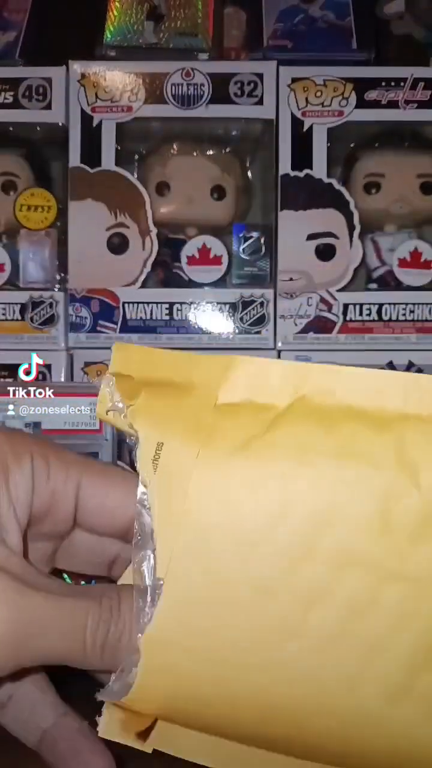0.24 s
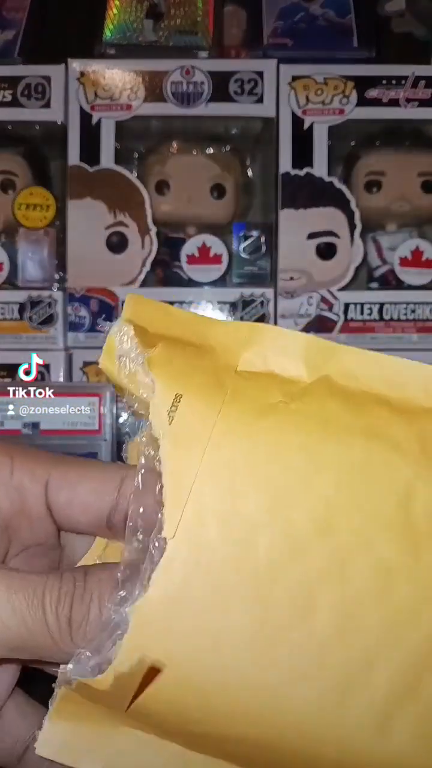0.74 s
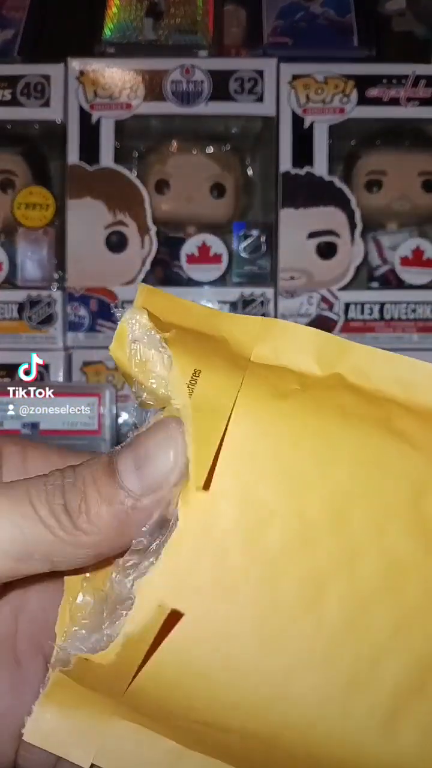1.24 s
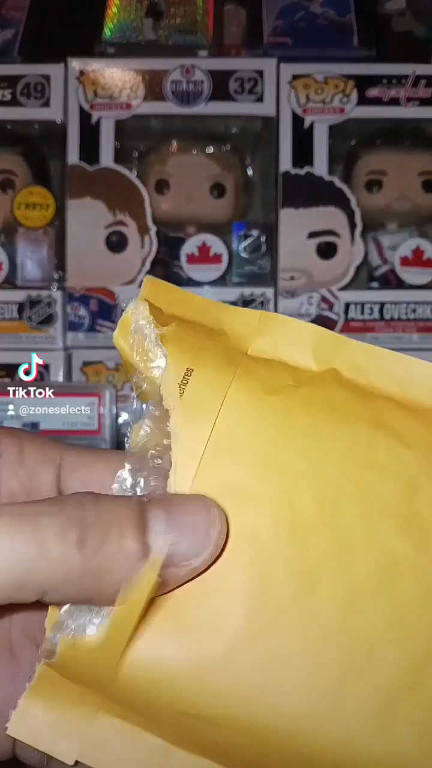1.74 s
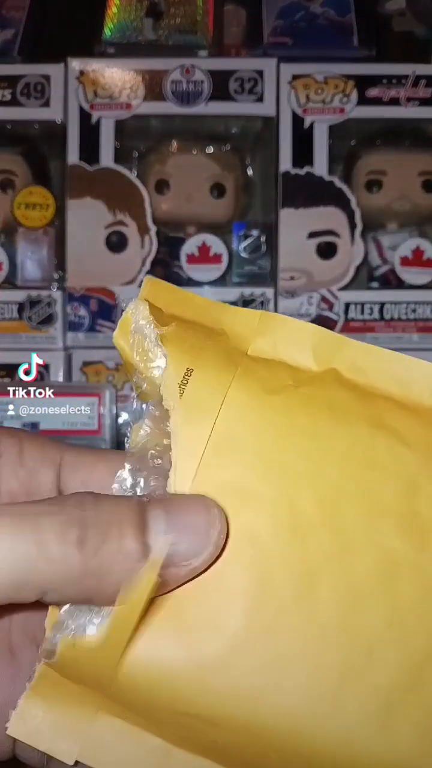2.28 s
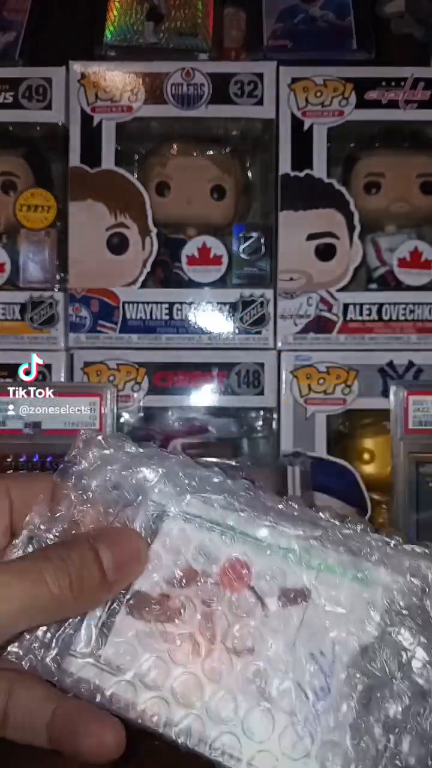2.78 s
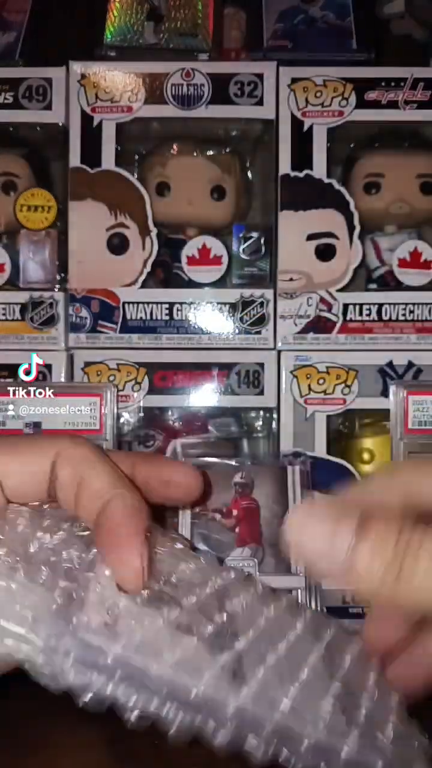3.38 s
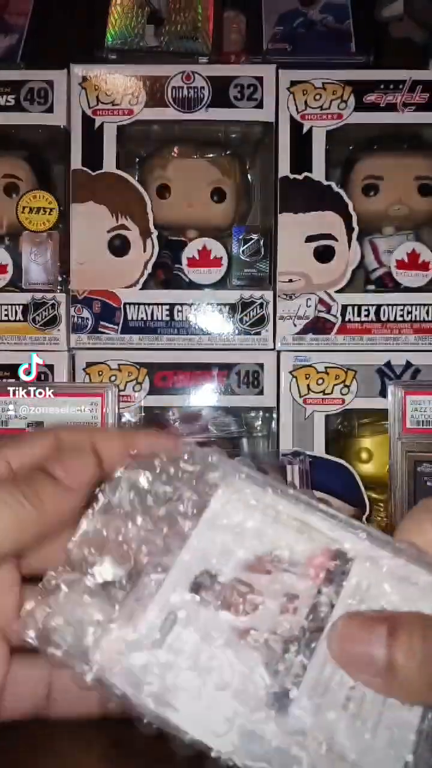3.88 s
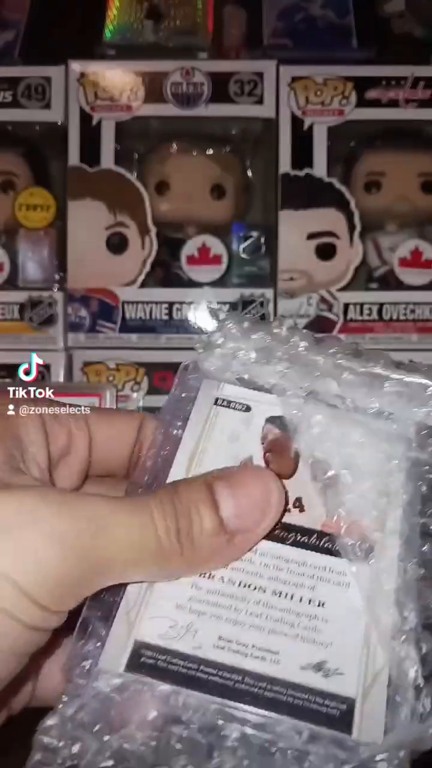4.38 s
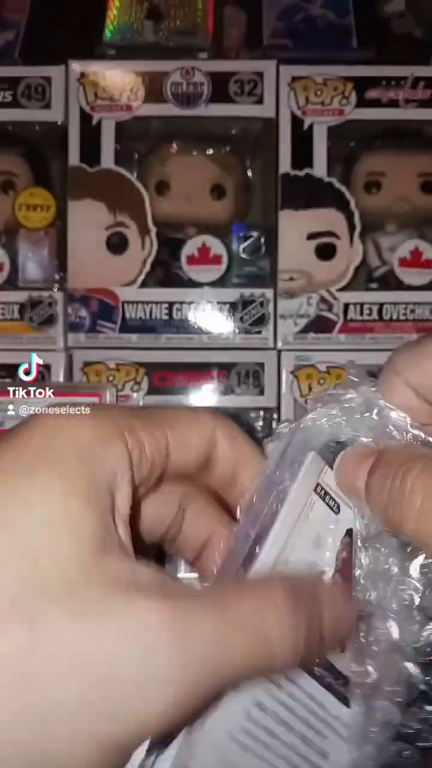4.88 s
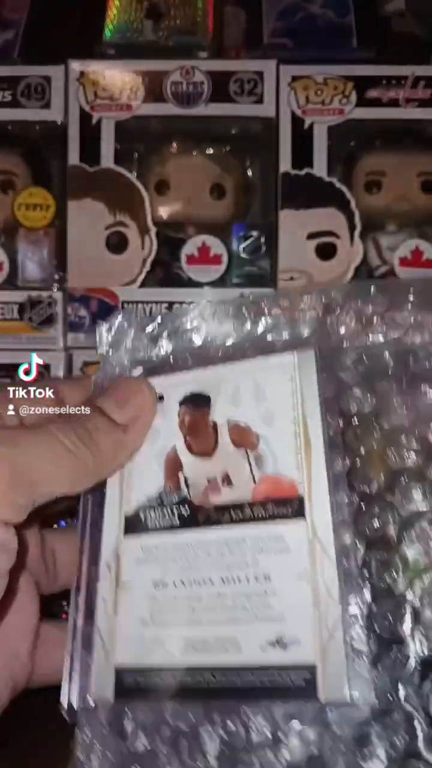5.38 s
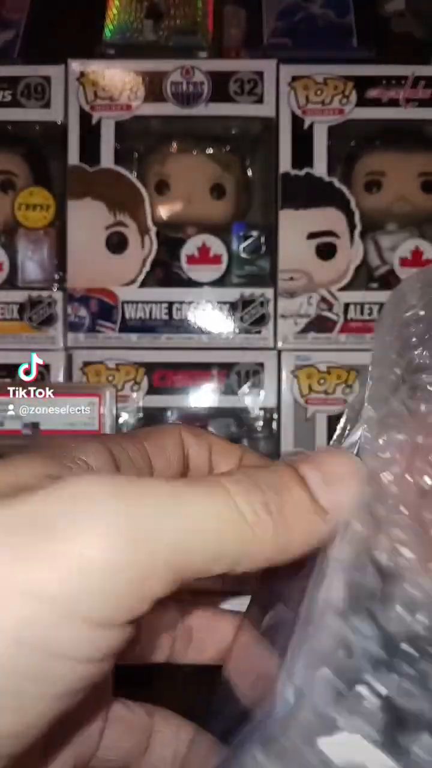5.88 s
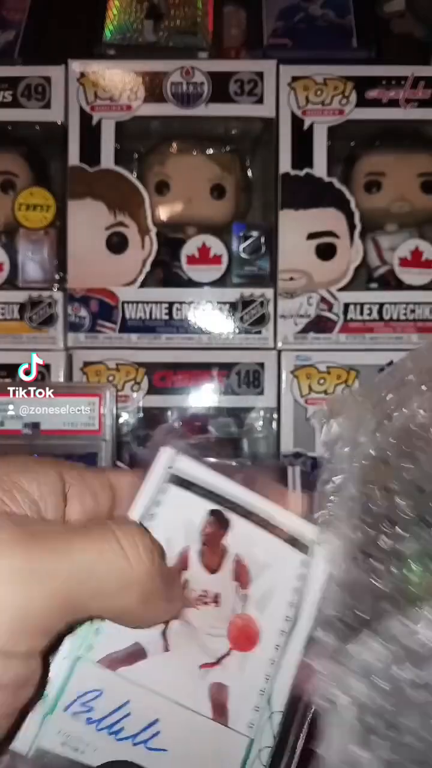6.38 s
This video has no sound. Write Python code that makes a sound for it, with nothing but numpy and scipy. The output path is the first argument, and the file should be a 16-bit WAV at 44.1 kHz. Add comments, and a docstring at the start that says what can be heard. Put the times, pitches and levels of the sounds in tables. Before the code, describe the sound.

Hands handle an already opened padded mailer, with busy papery crackles, sharp crease snaps and soft low bumps. A quick rushing pull brings out the packet. Lighter bubble-wrap crinkling follows, then three brief, loud rips with gaps of rustling between them, the last ending in a rasp of hard plastic. Close phone microphone, small room, faint steady room noise.

```python
"""Bubble-wrapped card pulled from a padded mailer

Hands pull the packet out of a paper mailer, then rip the wrap in three fast rips, close to a phone in a small room.
Film and paper buckle in clouds of noise clicks; creases snap through as dispersed, ringing bursts.
Scuffs are short puffs of the clicks, bumps are damped low swings, and the card holder rasps in filtered clicks.
A faint noise ring comes and goes; two unlike ports hear it all with shelf echoes, over a room tone."""
import sys
import numpy as np
from scipy import signal
from scipy.fft import rfft, irfft, next_fast_len
from scipy.io import wavfile

SR = 44100
rng = np.random.default_rng(int(sys.argv[2]) if len(sys.argv) > 2 else 0)


def transcribe(u):
    """Save the signal u as a 16-bit wav file named by the first command-line argument.

    u: samples, shape (n,) or (channels, n), limited to [-1, 1]; the rate is SR.
    q: integer samples, one column per channel.
    """
    v = np.clip(np.atleast_2d(u).T, -1, 1)
    q = np.round(v * 32767).astype(np.int16)
    wavfile.write(sys.argv[1], SR, q)


N = 292383
TIME_S = np.arange(N) / SR

# spectrum of the thin film: (frequency [Hz], relative level per hertz [dB])
FILM = [(1200, -18), (2200, -3), (3100, 1), (4800, 0.5), (6500, -2), (9300, -2.5), (12500, -1),
        (16000, -2.5)]
# spectrum of the stiffer sheet: (frequency [Hz], relative level per hertz [dB])
SHEET = [(500, -20.5), (900, -5.5), (1250, -6), (1550, 2), (2000, -2), (2600, -1.5), (4000, -10)]
# spectrum of the air held in the packet: (frequency [Hz], relative level per hertz [dB])
BODY = [(40, -12), (125, -10), (200, -8), (280, -10.5), (370, -8), (490, -4), (590, 2.5), (720, -1),
        (950, -9), (1500, -13.5)]


def undb(db):
    """Decibels to gain."""
    return 10 ** (np.asarray(db) / 20)


def unit(x):
    """Scale to rms 1."""
    return x / np.sqrt(np.mean(x ** 2))


def convolve(x, response):
    """Filter each channel, keeping the length."""
    return signal.oaconvolve(x, np.atleast_2d(response), axes=-1)[:, :x.shape[-1]]


def colour(x, points, size=2048):
    """Minimum-phase filter with the given (Hz, dB) spectrum, by folding the cepstrum."""
    points_hz, points_db = np.transpose(points)
    bins_hz = np.maximum(np.arange(size // 2 + 1) * SR / size, 1)
    gain = undb(np.interp(np.log(bins_hz), np.log(points_hz), points_db))
    cepstrum = irfft(np.log(gain))
    cepstrum[1:size // 2] *= 2
    cepstrum[size // 2 + 1:] = 0
    return convolve(x, irfft(np.exp(rfft(cepstrum))))


def add(out, start_s, sound):
    """Mix a sound in at a time in seconds."""
    i = int(np.clip(start_s * SR, 0, N - 1))
    out[:, i:i + sound.shape[1]] += sound[:, :N - i]


def air(size, alike_hz=1900):
    """Flat noise at the two ports: long waves reach both alike, short ones do not."""
    hz = np.arange(size // 2 + 1) * SR / size
    mid, side = rfft(rng.standard_normal((2, size)))
    apart = hz ** 2 / (hz ** 2 + alike_hz ** 2)
    port_sign = np.array([[1], [-1]])
    return irfft((mid + port_sign * apart * side) / np.sqrt(1 + apart ** 2))


def room_tone(level_db=-67.5):
    """Steady coloured noise of the room, independent at each port."""
    # (frequency [Hz], relative level per hertz [dB])
    tone_spectrum = [(18, -36), (30, -1.5), (107, 2), (774, -27), (2430, -17.5), (2700, -22.5), (3780, 2.5),
                     (7430, -8), (15000, -22.5)]
    return undb(level_db) * unit(colour(rng.standard_normal((2, N)), tone_spectrum))


def flick(decay_s, size=512):
    """One buckle of a facet: a brief burst of energy 1."""
    burst = air(size) * np.exp(-np.arange(size) / SR / decay_s)
    return burst / np.sqrt(np.sum(burst ** 2, axis=1, keepdims=True))


def crackle(per_s, spread_db, decay_s, rub_db, facets=3):
    """Buckles of very unequal size on a few facets, in the fine hiss of surfaces rubbing; rms 1."""
    clicks = 0
    fires = slice(int(per_s * N / SR / facets))
    for _ in range(facets):
        when, strength, side = rng.random((3, N // 12))
        size_db = spread_db * np.minimum(-np.log(1 - strength), 5)
        sizes = np.sign(side - .5) * undb(size_db)
        impulses = np.bincount((when[fires] * N).astype(int), sizes[fires], N)
        clicks = clicks + convolve(impulses[None], flick(decay_s))
    hiss = air(2 * next_fast_len(N // 2 + 1, True))[:, :N]
    return unit(unit(clicks) + undb(rub_db) * unit(hiss))


def catch(per_s, depth_db):
    """Gain of a grip that catches and slips at random; rms 1."""
    knots_s = np.cumsum(rng.exponential(1 / per_s, N // 100))
    depths = np.clip(rng.standard_normal(len(knots_s)), -2, 2)
    return unit(undb(depth_db * np.interp(TIME_S, knots_s, depths)))


def effort(peak_s, db, swell_s, fade_s, hold_s=0, drop_db=9, curve=1.67):
    """Gain of one move: it swells, may hold, and fades; drop_db down one swell or fade time away."""
    before = (peak_s - TIME_S) / max(swell_s, .005)
    after = (TIME_S - peak_s - hold_s) / max(fade_s, .005)
    away = np.clip(np.maximum(before, after), 0, 10)
    return undb(db - drop_db * away ** curve)


def rustle(drive, film_power, sheet_power, body_power):
    """The same buckles sound in film, sheet and held air, each with its own power."""
    film = np.sqrt(film_power) * unit(colour(drive, FILM))
    sheet = np.sqrt(sheet_power) * unit(colour(drive, SHEET))
    body = np.sqrt(body_power) * unit(colour(drive, BODY))
    return film + sheet + body


def grips(moves, drive, film_db, sheet_db, body_db, sheet_share):
    """Each grip crinkles the film; the deeper it presses into the hollow, the more the sheet crackles too."""
    film = sheet = body = 0
    for s, db, swell_s, fade_s, hollow_db in moves:
        force = effort(s, db, swell_s, fade_s)
        film = film + (force * undb(film_db)) ** 2
        sheet = sheet + (force * undb(sheet_db + sheet_share * hollow_db)) ** 2
        body = body + (force * undb(body_db + hollow_db)) ** 2
    return rustle(drive, film, sheet, body)


def mailer_grips(drive):
    """Grips on the paper mailer crinkle its film and sheet and press its hollow."""
    # (time of most force [s], relative level [dB], swell [s], fade [s], relative hollow level [dB])
    mailer_moves = [(.03, -48.5, 0.051, 0.18, -3), (.19, -50.5, 0.048, 0.094, -7.5),
                    (.28, -45.5, 0.036, 0.052, -17.5), (.44, -50.5, 0.08, 0.061, -17.5),
                    (.6, -60, 0.067, 0.1, -22), (.745, -52, 0.05, 0.12, -44),
                    (.9, -47, 0.054, 0.067, -12.5), (1.015, -45.5, 0.045, 0.033, -10),
                    (1.13, -52.5, 0.11, .065, -10.5), (1.32, -45.5, 0.033, 0.014, -10.5),
                    (1.385, -43.5, 0.065, 0.11, -16.5), (1.57, -48.5, 0.038, 0.09, -19.5),
                    (1.68, -47.5, 0.04, 0.062, -19), (1.79, -41, 0.082, 0.062, -20.5),
                    (1.94, -51, 0.17, 0.035, -18), (2.05, -47.5, 0.15, 0.15, -17),
                    (2.19, -49.5, 0.035, .08, -31)]
    return grips(mailer_moves, drive, film_db=3.5, sheet_db=4.5, body_db=0, sheet_share=0.41)


def snap_wave(spread_s, scatter_db, size=512):
    """A snap crosses the sheet as bending waves, treble first; a stronger noisy scatter sounds together with it."""
    hz = np.arange(size // 2 + 1) * SR / size
    port_stretch = np.array([[1], [1.06]])
    delay_s = 0.000697 + spread_s * port_stretch * np.sqrt(1000 / (hz + 300))
    # phase is the running sum of group delay
    sweep = irfft(np.exp(-2j * np.pi * np.cumsum(delay_s, axis=1) * SR / size))
    scatter = np.roll(flick(decay_s=0.0017), int(.001 * SR), axis=1)
    return sweep + undb(scatter_db) * scatter


def snaps(quality=1.15, film_db=-7, edge_db=-11, thud_db=7, gain_db=-14, pad=256):
    """A crease snaps through: a few cycles of its own ring, a shiver of the film, a crisp edge and a body knock."""
    # creases: (time [s], relative level [dB], ring frequency [Hz], relative body level [dB])
    creases = [(0.051, -24, 1480, -13), (0.189, -20, 1320, 3), (0.222, -21, 2960, -22),
               (.407, -20.5, 2500, -14.5), (.905, -26, 1595, -15), (.913, -22.5, 1590, -30),
               (.965, -36.5, 6050, -30), (1.018, -25.5, 9000, -40), (1.104, -38, 2180, -27),
               (1.398, -30, 9200, -42), (1.663, -29.5, 4720, -43), (1.681, -35, 4900, -36),
               (1.794, -21, 1660, -6.5), (1.84, -30, 3770, -1), (2.049, -24.5, 1350, -37),
               (2.068, -15.5, 2170, -21), (2.742, -30.5, 1570, 0.5), (2.895, -14, 2280, -24.5),
               (2.969, -38, 1890, -30), (3.014, -33, 2250, -16), (3.061, -38, 1900, -17),
               (3.117, -39.5, 5400, -29), (3.435, -29.5, 6100, -56), (3.587, -35, 2970, -18),
               (3.73, -32.5, 7000, -47), (4.209, -17.5, 5270, -37), (4.359, -28.5, 4830, -26),
               (4.439, -32, 10800, -47), (4.514, -24.5, 11800, -38), (5.042, -24.5, 3520, -50),
               (5.07, -17, 4160, -25), (5.097, -18.5, 6100, -36), (5.119, -19, 1700, -21),
               (5.201, -18, 630, 4), (5.215, -21, 5000, 2), (5.267, -28.5, 5570, -8),
               (5.282, -26.5, 5500, -9), (5.378, -27, 4200, -37), (5.413, -32.5, 6500, -63),
               (5.532, -32, 4450, -10), (6.152, -17, 4670, -29.5), (6.369, -46, 9200, -8)]
    # spectrum of the edge: (frequency [Hz], relative level per hertz [dB])
    edge_spectrum = [(1500, -7), (4000, 15.5), (7000, -1.5), (12500, -13.5), (16000, 1.5)]
    edge_db_per_octave, edge_from_hz = 1.5, 4200
    out = np.zeros((2, N))
    for s, db, hz, body_db in creases:
        burst = np.hstack([snap_wave(spread_s=0.00127, scatter_db=3.5), np.zeros((2, pad))])
        b, a = signal.iirpeak(min(hz, SR / 3), max(quality, 1), fs=SR)
        ring = unit(signal.lfilter(b, a, signal.lfilter(b, a, burst)))
        shiver = undb(film_db) * unit(colour(burst, FILM))
        # the higher a crease rings, the crisper its edge
        crisp_db = edge_db + edge_db_per_octave * np.log2(hz / edge_from_hz)
        edge = undb(crisp_db) * unit(colour(burst, edge_spectrum))
        knock = undb(body_db + thud_db) * unit(colour(burst, BODY))
        add(out, s, undb(db + gain_db) * unit(ring + shiver + edge + knock))
    return out


def bumps(gain_db=3.0, rough=0.94, rise_s=0.0035, t60_s=0.11, size=12000):
    """Fingers jog the soft packet: a low, rough, quickly damped swing."""
    # (time [s], relative peak level [dB], pitch [Hz])
    jogs = [(0.914, -53, 220), (1.324, -50, 155), (1.491, -43.5, 123), (1.728, -42, 133),
            (1.794, -48.5, 136), (2.048, -46, 200), (2.299, -48, 70), (2.345, -54, 58), (2.752, -47, 50),
            (2.896, -40.5, 125), (3.018, -52, 121), (4.225, -37.5, 160), (4.784, -58, 78),
            (5.198, -39.5, 119), (5.244, -47, 62), (5.575, -47.5, 58), (6.127, -33, 238),
            (6.153, -41.5, 115), (6.251, -58, 100)]
    out = np.zeros((2, N))
    t = np.arange(size) / SR
    envelope = (1 - np.exp(-t / rise_s)) * np.exp(-np.log(1000) * t / t60_s)
    for s, db, hz in jogs:
        band = signal.butter(2, [hz / 2, 2 * hz], "band", fs=SR, output="sos")
        flutter = unit(signal.sosfilt(band, rng.standard_normal((2, size))))
        swing = (np.sin(2 * np.pi * hz * t) + rough * flutter) * envelope
        add(out, s, undb(db + gain_db) * swing / np.abs(swing).max())
    return out


def scuffs(drive, gain_db=-9, sheet_db=-4, hollow_db=8, rise_s=0.0028, size=4096):
    """Short dense puffs of buckles, two of them inside the last rip, each gone in a few hundredths of a second."""
    # (start [s], relative level [dB], relative body level [dB])
    puffs = [(1.322, -36.5, -12), (1.37, -35, -2.5), (1.486, -23, -13.5), (1.723, -26.5, -7.5),
             (3.959, -52.5, 10.5), (6.025, -28.5, -14), (6.111, -21.5, -18), (6.134, -13.5, -23),
             (6.497, -45, -18)]
    out = np.zeros((2, N))
    for s, db, body_db in puffs:
        span = slice(int(s * SR) + 1, int(s * SR) + size)
        film = unit(colour(drive[:, span], FILM))
        sheet = undb(sheet_db) * unit(colour(drive[:, span], SHEET))
        body = undb(body_db + hollow_db) * unit(colour(drive[:, span], BODY))
        age = (TIME_S[span] - s) / rise_s
        envelope = age * np.exp(1 - age)
        add(out, s, undb(db + gain_db) * envelope * (film + sheet + body))
    return out


def rips(drive, film_db=2, sheet_db=2, body_db=2, sheet_share=0.68, load_s=0.027):
    """The film gives way first; sheet and hollow join load_s later as the rip takes up load; all stop together."""
    # the pull out of the mailer, then three fast rips:
    # (full speed at [s], relative level [dB], swell [s], fade [s], relative hollow level [dB], hold [s])
    pulls = [(2.279, -37, 0.051, 0.072, -10.5, 0.028), (4.203, -32.5, 0.043, 0.031, -11.5, 0.056),
             (5.111, -33.5, .035, 0.023, 2.5, 0.087), (6.12, -33.5, 0.037, 0.0054, -5.5, 0.035)]
    film = sheet = body = 0
    for s, db, swell_s, fade_s, hollow_db, hold_s in pulls:
        tear = effort(s, db, swell_s, fade_s, hold_s)
        load = effort(s + load_s, db, swell_s, fade_s, hold_s - load_s)
        film = film + (tear * undb(film_db)) ** 2
        sheet = sheet + (load * undb(sheet_db + sheet_share * hollow_db)) ** 2
        body = body + (load * undb(body_db + hollow_db)) ** 2
    return rustle(drive, film, sheet, body)


def wrap_grips(drive):
    """Grips on the bubble wrap crinkle its film and sheet and press its hollow."""
    # (time of most force [s], relative level [dB], swell [s], fade [s], relative hollow level [dB])
    wrap_moves = [(2.61, -48, 0.13, 0.13, -7.5), (2.735, -56.5, 0.023, 0.033, 6.5),
                  (2.875, -47.5, 0.071, 0.043, -27), (2.92, -47, .025, 0.02, -8),
                  (3.01, -57, 0.047, 0.055, -2.5), (3.11, -56.5, 0.03, 0.051, -32),
                  (3.245, -57.5, 0.079, 0.053, -56), (3.44, -50.5, 0.15, 0.15, -31),
                  (3.7, -44, 0.067, 0.2, -51), (3.83, -40.5, 0.031, 0.079, -10),
                  (3.965, -57.5, 0.024, 0.042, 5.5), (4.03, -52.5, .04, 0.01, -22),
                  (4.37, -49, 0.14, 0.053, -24), (4.52, -50.5, 0.045, 0.039, -6),
                  (4.61, -45.5, 0.058, 0.059, -16), (4.71, -50, 0.043, 0.095, -13.5),
                  (4.85, -46, 0.029, 0.079, -46), (5.06, -48.5, 0.13, .03, -39.5),
                  (5.27, -50.5, 0.021, 0.028, -2), (5.39, -60.5, 0.087, 0.16, -39),
                  (5.56, -56.5, 0.042, 0.032, -2), (5.66, -58.5, 0.12, 0.024, -5.5),
                  (5.77, -62.5, 0.11, 0.046, -14), (5.98, -53, 0.071, .03, -6),
                  (6.4, -64, 0.14, 0.13, -7.5), (6.62, -57, 0.039, 0.046, 5)]
    return grips(wrap_moves, drive, film_db=5, sheet_db=-2.5, body_db=-1.5, sheet_share=0.59)


def faint_ring(ring_hz=1156, width_hz=97):
    """A narrow band of noise rises and sinks behind the rustle, alike at both ports."""
    # (loudest at [s], level [dB], swell [s], fade [s])
    swells = [(3.42, -67.5, 0.11, 0.16), (6.5, -76, 0.093, .14)]
    b, a = signal.iirpeak(ring_hz, ring_hz / width_hz, fs=SR)
    band = signal.lfilter(b, a, signal.lfilter(b, a, rng.standard_normal(N)))
    return unit(band) * sum(effort(*swell) for swell in swells)


def slide(drive, gain_db=-1):
    """The stiff card holder drags over the bubbles inside the wrap and rasps in its own middle register."""
    # (time of most force [s], relative level [dB], swell [s], fade [s])
    strokes = [(5.934, -42.5, 0.039, 0.037), (6.025, -45, 0.028, 0.021), (6.099, -29, 0.012, 0.041)]
    drag = sum(effort(*stroke) for stroke in strokes)
    rasp = colour(drive, [(400, -21), (750, -7.5), (1000, -0.5), (1350, -9.0), (2200, -4), (5000, -8.5)])
    return undb(gain_db) * drag * unit(rasp)


def room(x, t60_s=0.22, rise_s=0.0054, tail_db=-17, size=14000):
    """Near shelves scatter short echoes; a weak, duller tail follows."""
    # early reflections: (delay [s], level [dB])
    shelf_echoes = [(.0033, -13.5), (.0062, -19.5), (.0084, -24), (0.0103, -15)]
    t = np.arange(size) / SR
    envelope = np.exp(-np.log(1000) * t / t60_s) * (1 - np.exp(-t / rise_s))
    tail = rng.standard_normal((2, size)) * envelope
    tail = colour(tail, [(200, -11.5), (1500, 4), (5000, -3.0), (14000, -5.0)])
    response = undb(tail_db) * unit(tail) / np.sqrt(size)
    for delay_s, db in shelf_echoes:
        echo = flick(decay_s=0.00072)
        i = int(delay_s * SR)
        response[:, i:i + echo.shape[1]] += undb(db) * echo
    return x + convolve(x, response)


def scene():
    """Mailer, wrap and rips with their snaps, scuffs and bumps, over a faint room tone."""
    handling = crackle(per_s=1000, spread_db=4.0, decay_s=0.00047, rub_db=3)
    handling = handling * catch(per_s=150, depth_db=2.5)
    # in a rip the film catches and gives way hundreds of times a second
    tearing = crackle(per_s=3000, spread_db=2.5, decay_s=0.00029, rub_db=2.0)
    tearing = tearing * catch(per_s=350, depth_db=4.0)
    hands = mailer_grips(handling) + wrap_grips(handling) + rips(tearing)
    packet = hands + slide(tearing) + snaps() + scuffs(handling) + bumps()
    return room(packet) + faint_ring() + room_tone()


def record(dry, lag_samples=2, low_hz=36, top_hz=15800):
    """The right port lies a little further off and has a resonant duct; the phone cuts the rumble and the top."""
    # right port: (frequency [Hz], gain [dB])
    duct_response = [(60, 2.5), (130, -2.5), (400, -2), (900, 6), (1220, 2.5), (1650, 6), (2400, -4),
                     (3500, 3), (4100, 2), (5200, 6), (7400, -6), (9400, -6), (13500, -3), (15000, -24.5)]
    right = np.pad(colour(dry[1:], duct_response)[0], (lag_samples, 0))[:N]
    rumble_cut = signal.butter(2, low_hz, "high", fs=SR, output="sos")
    top_cut = signal.ellip(10, .2, 80, top_hz, fs=SR, output="sos")
    ports = signal.sosfilt(rumble_cut, [dry[0], right])
    return signal.sosfilt(top_cut, ports)


dry = scene()
out = record(dry)
transcribe(out)
```